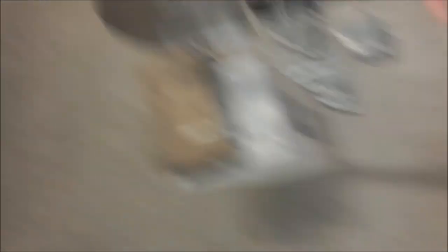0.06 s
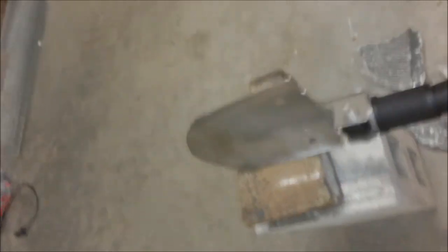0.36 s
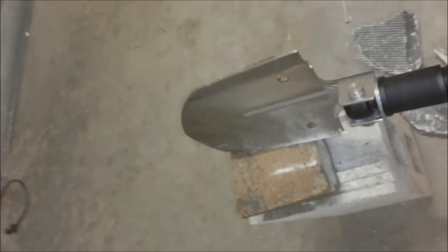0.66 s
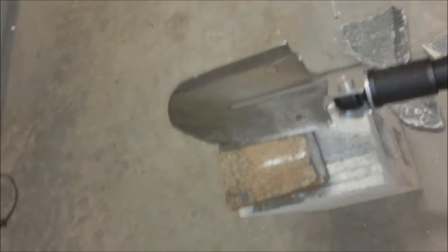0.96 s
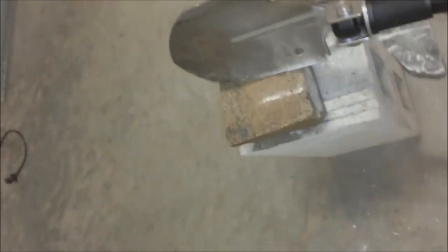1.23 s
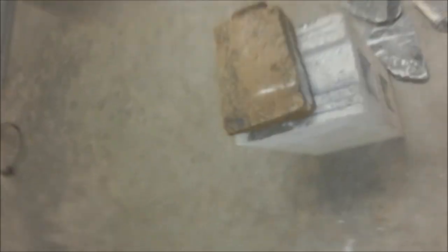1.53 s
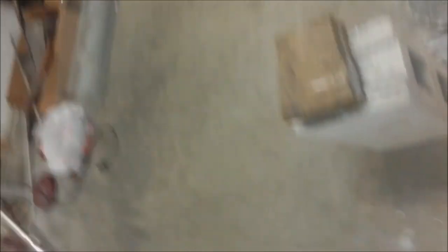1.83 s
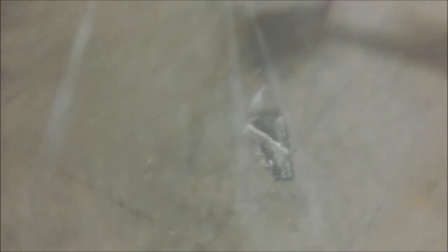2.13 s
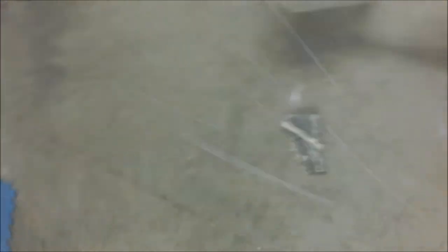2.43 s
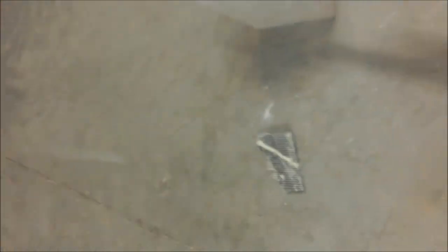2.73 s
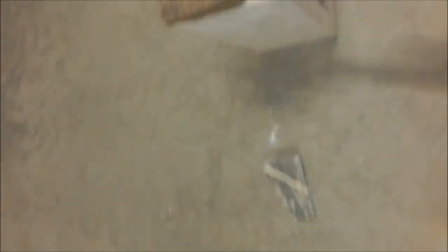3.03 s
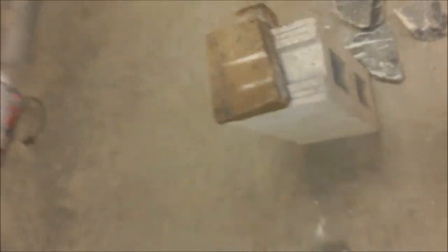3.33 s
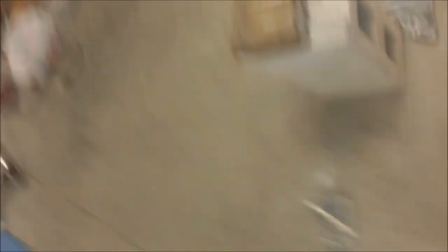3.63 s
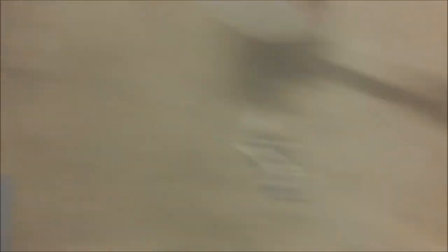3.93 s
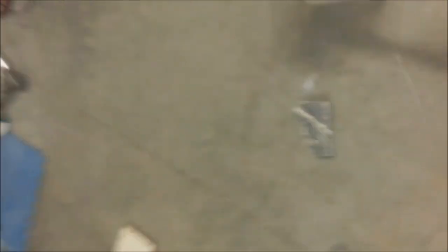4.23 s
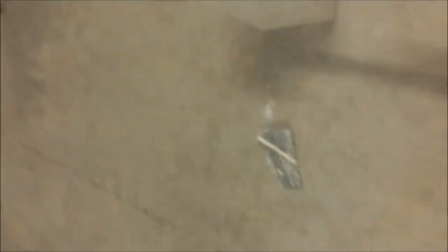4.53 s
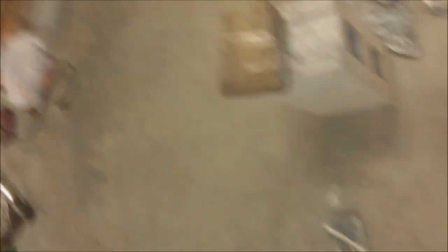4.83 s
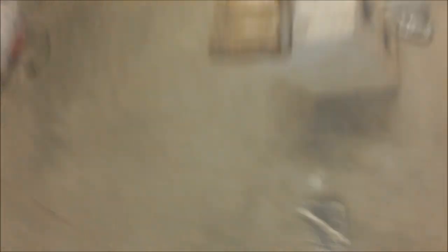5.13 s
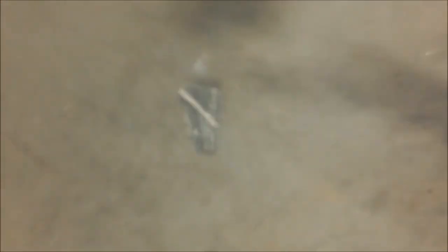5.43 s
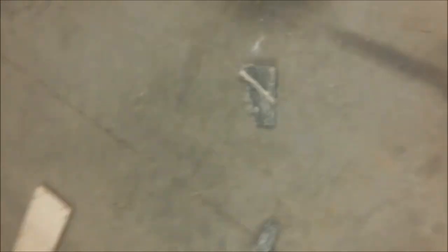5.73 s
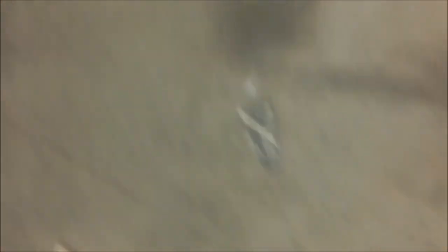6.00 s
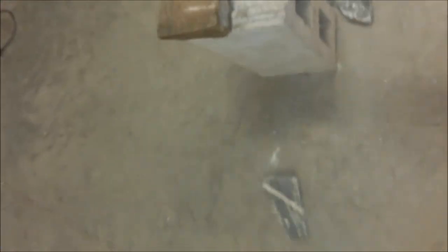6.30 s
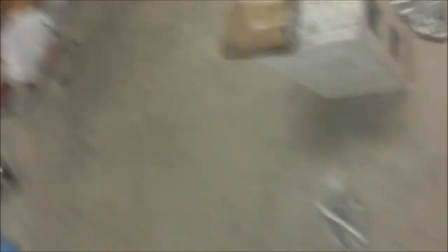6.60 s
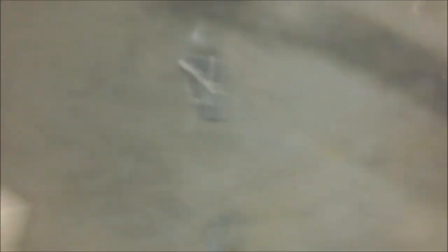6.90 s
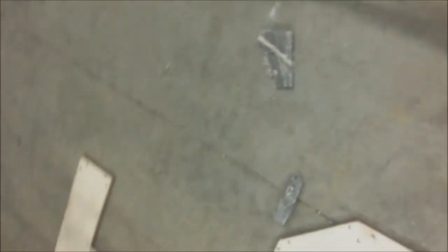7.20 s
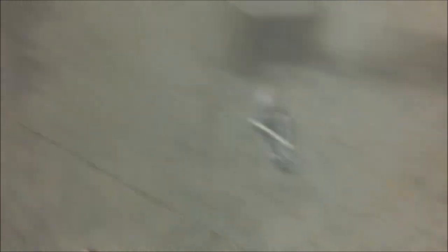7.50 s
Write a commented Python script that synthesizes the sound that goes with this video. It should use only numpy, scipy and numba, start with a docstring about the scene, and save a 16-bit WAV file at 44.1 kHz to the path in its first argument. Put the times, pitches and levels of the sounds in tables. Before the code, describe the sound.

A steel shovel chops a brick four times with crunching, ringing clangs in an echoing concrete garage.

```python
"""A bare concrete garage, a stereo microphone close to a brick. Over low room noise a steel shovel is set
on the brick and lifted. Four chops follow: sleeves rustle, the edge whistles faintly, brick crushes and
the blade rings on into the room, while the recorder's compressor and limiter hold each blow down.
The blade knocks lightly after the first two chops, something scuffs the floor before the third,
and grit ticks here and there to the end."""
import sys
import numpy as np
from scipy import signal
from scipy.fft import rfft, irfft, next_fast_len
from scipy.io import wavfile
from scipy.ndimage import uniform_filter1d
from numba import njit

SR = 44100
rng = np.random.default_rng(int(sys.argv[2]) if len(sys.argv) > 2 else 0)


def unload_audio(sound):
    """Save the sound as a 16-bit wav file, at the path given as the first command line argument."""
    columns = np.transpose(np.atleast_2d(sound))
    # keep every value between -1 and 1, then stretch to whole-number steps
    steps = np.round(np.clip(columns, -1, 1) * 32767)
    wavfile.write(sys.argv[1], SR, steps.astype(np.int16))


N = 337527
TIME = np.arange(N) / SR
TAIL = np.arange(int(1.6 * SR)) / SR  # seconds since the start of one event

# the four swings: landing_s, final_whistle_hz, whistle_db, wind_up_s, sleeves_db
SWINGS = [(2.222, 1157, -42.5, .6, -65), (3.951, 1544, -48, 0.46, -53.5), (5.472, 1445, -50, 0.538, -53),
          (6.932, 1448, -43, 0.32, -50.5)]


def undb(db):
    """Decibels to gain."""
    return 10 ** (np.asarray(db) / 20)


def unit(x):
    """Scale to rms 1."""
    return x / np.sqrt(np.mean(x ** 2))


def fade(t60):
    """A free decay that loses 60 dB in t60 seconds."""
    return np.exp(-np.log(1000) * TAIL / max(t60, 1e-3))


def colour(x, points):
    """Causal filter through (freq_hz, gain_db) points, built from the cepstrum of its log gain."""
    n = 2 * next_fast_len(x.shape[-1] // 2 + 1024)
    hz, db = np.transpose(points)
    log_hz = np.log(np.maximum(np.arange(n // 2 + 1) * SR / n, 1))
    cepstrum = irfft(np.log(undb(np.interp(log_hz, np.log(hz), db))))
    cepstrum[1:n // 2] *= 2
    cepstrum[n // 2 + 1:] = 0
    return irfft(rfft(x, n) * np.exp(rfft(cepstrum)))[..., :x.shape[-1]]


def walk(rate_hz, size=len(TAIL)):
    """A smooth random wander with a spread near 1."""
    step = max(int(SR / rate_hz), 2)
    knots = rng.standard_normal(size // step + 2)
    return uniform_filter1d(np.interp(np.arange(size) / step, np.arange(len(knots)), knots), step // 2)


def add(track, start_s, sound):
    """Mix a sound into the track at start_s."""
    start = int(start_s * SR)
    part = sound[..., :N - start]
    track[..., start:start + part.shape[-1]] += part


def stereo_noise(correlation, size=N):
    """Left and right noise that are partly alike."""
    mid, side = rng.standard_normal((2, size))
    spread = np.sqrt(1 - correlation) * side * np.array([[1], [-1]])
    return (np.sqrt(1 + correlation) * mid + spread) / np.sqrt(2)


def room_noise(level_db=-45, dip_db=-14.5, hold_s=1, recover_db_per_s=16, flutter_db=1):
    """A low, restless background that dips at each chop, stays down a while and creeps back."""
    # spectrum of the room noise: freq_hz, gain_db
    spectrum = [(15, -55), (25, -28), (86, -8.5), (125, 1.5), (150, -4.5), (475, -9.5), (1090, -14.5),
                (1210, -20.5), (1500, -18.5), (1960, -21), (3180, -25.5), (5880, -42), (6900, -69),
                (13800, -40), (15000, -33.5)]
    change_db = np.zeros(N)
    for landing_s, *_ in SWINGS:
        recovered_db = recover_db_per_s * np.maximum(TIME - landing_s - hold_s, 0)
        change_db = np.where(TIME > landing_s, np.minimum(dip_db + recovered_db, 0), change_db)
    noise = unit(colour(stereo_noise(correlation=0.73), spectrum))
    return noise * undb(level_db + change_db + flutter_db * walk(9, N))


def garage(x, build_s=0.015, early_db=3, early_s=0.013):
    """Floor and block reflect at once; the walls answer with a long tail that dulls as it fades."""
    # reverberation of the bare concrete: freq_hz, t60_s
    decays = [(50, 0.81), (130, 0.98), (300, 1), (700, 0.7), (1500, 0.91), (3000, 0.82), (6000, 0.59),
              (10000, 0.41), (15000, 0.19)]
    # likeness of diffuse sound at the microphone's two ports: freq_hz, correlation
    likeness = [(50, .2), (130, .75), (300, .65), (700, .25), (1500, 0), (3000, -.15), (15000, -.1)]
    log_hz = np.log(np.maximum(np.fft.rfftfreq(len(TAIL), 1 / SR), 1))
    centres = np.log([hz for hz, _ in decays])
    response = 0
    for this_band, (hz, t60) in zip(np.eye(len(decays)), decays):
        diffuse = stereo_noise(np.interp(hz, *np.transpose(likeness)), len(TAIL))
        band = np.sqrt(np.interp(log_hz, centres, this_band))
        response = response + irfft(rfft(diffuse) * band, len(TAIL)) * fade(t60)
    response *= 1 - np.exp(-TAIL / build_s) + undb(early_db) * np.exp(-TAIL / early_s)
    return signal.fftconvolve(x[None], unit(response) / np.sqrt(len(TAIL)), axes=1)[:, :N]


def nearby(x, count=14, decay_s=.014):
    """The straight path plus early reflections off floor, block and holder, different at each port."""
    response = np.zeros((2, SR // 40))
    response[:, 0] = 1
    for port in response:
        lags = rng.integers(8, len(port), count)
        port[lags] += .4 * rng.choice([-1, 1], count) * np.exp(-lags / (decay_s * SR))
    return signal.fftconvolve(x[None], response, axes=1)[:, :N]


def sleeves(grain_db=3, rise_s=0.14, settle_s=.08, idle_db=-65):
    """Cloth rubs in tiny slips through each wind-up, settles after the blow and stirs faintly between."""
    # spectrum of rubbing cloth: freq_hz, gain_db
    cloth = [(500, 1.5), (2000, -2), (4000, -4), (6800, -15.5), (8500, -11.5), (10000, 1), (12000, -12.5),
             (15000, -10.5)]
    folds_db = 1.5 * walk(25, N)
    slips = undb(grain_db * walk(620, N) + folds_db)
    motion = undb(idle_db)
    for landing_s, _, _, wind_up_s, db in SWINGS:
        rise = np.clip((TIME - landing_s + wind_up_s) / rise_s, 0, 1)
        settle = np.exp(-np.maximum(TIME - landing_s, 0) / settle_s)
        motion = motion + undb(db) * rise * settle
    return unit(colour(stereo_noise(correlation=0.1) * slips, cloth)) * motion


def grainy_burst(decay_s, grain_db=5):
    """A fading burst of tiny noise grains of uneven size, with the energy of 10 ms at rms 1."""
    sizes = undb(grain_db * walk(1500))
    burst = rng.standard_normal(len(TAIL)) * sizes * np.exp(-TAIL / decay_s)
    return burst * np.sqrt(SR / 100 / np.sum(burst ** 2))


def scuff(start_s=5.004, gain_db=-31, room_db=7):
    """A short dull scrape on the floor, reaching the microphone mostly through the room."""
    # spectrum of scraped concrete: freq_hz, gain_db
    spectrum = [(100, -20.5), (250, -7), (450, 5.5), (850, -3.5), (1350, 3), (2000, 3), (3600, -6),
                (5000, -26.5), (12000, -31)]
    direct = np.zeros(N)
    add(direct, start_s, undb(gain_db) * colour(grainy_burst(decay_s=.04), spectrum))
    return direct + undb(room_db) * garage(direct)


def grit_and_cloth(crumb_count=7, crumb_db=-54, spread_db=4, crumb_body_db=-15, crumb_s=.002, trim_db=-9.5):
    """Small bright clicks of grit, short brushes of cloth as a rustle starts, and faint random crumbs."""
    # clicks and brushes: start_s, relative_db, body_db (gain up to 4 kHz), decay_s
    ticks = [ (0.482, -49.5, -12, .002), (2.607, -43.5, -6, .002), (3.336, -30.5, 5, 0.0024),
             (3.356, -35, 4, 0.074), (3.562, -32.5, 6, 0.086), (4.513, -35.5, 1.5, 0.0017),
             (4.969, -40.5, -9, .002), (5.780, -31.5, -4, .002), (6.676, -37.5, 2.5, 0.0064),
             (6.830, -28, 4, 0.016), (7.475, -43.5, 19.5, 0.013)]
    # spectrum they all share: freq_hz, gain_db
    spectrum = [(150, -9), (600, -11), (2000, -0.5), (4500, -3.5), (6800, 0.5), (10000, 10), (12000, 1),
                (15000, -11.5)]
    crumbs = [(when * N / SR, crumb_db + spread_db * (2 * size - 1), crumb_body_db, crumb_s)
              for when, size in rng.random((crumb_count, 2))]
    out = np.zeros(N)
    for start_s, db, body_db, decay_s in list(ticks) + crumbs:
        tick = colour(grainy_burst(decay_s)[:SR // 2], [(4000, body_db), (8000, 0)])
        add(out, start_s, undb(db + trim_db) * tick)
    return colour(out, spectrum)


def swing_whistles(length_s=0.076, start_ratio=0.78):
    """Eddies shed by the blade's edge rise in pitch as it speeds up toward the brick."""
    out = np.zeros(N)
    progress = np.linspace(0, 1, int(length_s * SR))
    swell = np.sin(np.pi * progress ** 2)
    for landing_s, final_hz, db, *_ in SWINGS:
        eddies = 1 + .16 * walk(1500, len(progress))
        pitch_hz = final_hz * (start_ratio + (1 - start_ratio) * progress) * eddies
        add(out, landing_s - length_s, undb(db) * swell * np.sin(2 * np.pi * np.cumsum(pitch_hz) / SR))
    return out


def bending(hz, t60, pan_db, port_phase_rad, waver_db=3):
    """One bending mode of the blade, wavering in level and phase at each port; pan is left minus right."""
    ports = []
    for side in (.5, -.5):
        phase = 2 * np.pi * hz * TAIL + side * port_phase_rad + .4 * walk(16)
        ports.append(np.sin(phase) * undb(side * pan_db + waver_db * walk(13)))
    onset = 1 - np.exp(-TAIL / 0.002)
    return np.array(ports) * fade(t60) * onset


def beat(hz, lull_s, reflection_db=-6.5, bloom_db=3, bloom_s=0.073):
    """Gain of a mode as the moving blade beats against its reflection, which takes a moment to build."""
    reflection = undb(reflection_db) * np.exp(2j * np.pi * hz * (TAIL - lull_s))
    return np.abs(1 - reflection) * undb(-bloom_db * np.exp(-TAIL / bloom_s))


def upper_ring(t60_scale, spread_db=1.5, detune_spread=.001):
    """The blade's upper modes, in a slightly different mix each time the edge lands."""
    # upper modes of the steel: pitch_hz, relative_db, unscaled_t60_s
    modes = [ (1171.6, 0, 0.59), (1572, -5, 0.34), (2144, -2.5, 0.99), (2605, -7.5, 0.34),
             (2888, -10, 0.87), (2932, 4, 0.78), (3435, -4.5, .8), (3640, -8, 0.94), (3920, -9, 1.0),
             (4300, -7.5, .55), (4980, -2.5, .65), (6140, 1.5, 0.5), (7811, -11.5, .45), (8942, -4.5, .45),
             (10300, -3.5, .4), (10930, -2.5, .44), (11350, -5, .3)]
    chance = rng.standard_normal((len(modes), 2)) * (spread_db, detune_spread)
    return sum(undb(db + offset_db) * np.sin(2 * np.pi * hz * (1 + detune) * TAIL) * fade(t60 * t60_scale)
               for (hz, db, t60), (offset_db, detune) in zip(modes, chance))


def brick_crack(decay_s, hardness):
    """Steel crushes brick: fractures alone for the close sound, push and fractures for the room."""
    # spectrum of crushing brick: freq_hz, gain_db
    spectrum = [(30, -13), (70, 0), (115, 0), (160, 3.5), (250, 9), (480, 1.5), (680, -0.5), (1100, 3.5),
                (2300, -1), (3400, -0.5), (4800, -6.5), (6800, -7.5), (9000, 0), (10900, 1.5), (14500, -14)]
    push = np.sqrt(SR / 100) * (TAIL == 0)  # an impulse with the same energy as the fractures
    fractures = grainy_burst(decay_s)
    whole_blow = .8 * push + .6 * fractures
    return colour(colour(np.array([fractures, whole_blow]), spectrum), hardness)


def shovel(thump_hz=153, touch_s=0.074, crack_trim_db=-9.5, near_db=-2,
           crack_room_db=4, ring_room_db=5, ring_direct_db=-8):
    """Each contact cracks, rocks the brick and rings the blade; returns close sound and room feed."""
    # blade contacts, levels relative: start_s, crack_db, bass_db, edge_db, treble_db, crush_s, room_db,
    # thump_db, low_db, main_db, upper_db, t60_scale, extra_hz, extra_db, beat_hz, lull_s, free_s
    contacts = [ (0.535, -10.5, -3, -10.5, -2.5, 0.0041, -7.5, -23.5, -51, -57, -46, 0.95, 1210, -42.5, 3, 0.18, 1),
                (1.556, -22.5, -22, 1, 3, 0.0039, -3.5, -73, -55.5, -47.5, -48, 0.34, 2210, -49, 3.3, 0.18, 0.77),
                (2.226, 4.5, -1, -0.5, 0.5, 0.023, -0.5, -31.5, -18, -4.5, -23.5, 0.72, 2888, -21, 4.9, .29, 0.58),
                (2.738, -4.5, -4.5, -6, -13.5, .0035, -9.5, -50, -38, -29.5, -34.5, 0.47, 1595, -35.5, 3.4, 0.11, 0.57),
                (3.958, 5.5, -2.5, 2, -0.5, 0.01, .5, -21, -18.5, -16, -19.5, 0.57, 2636, -20.5, 2.7, 0.29, .48),
                (4.439, -4, -7.5, -4, -16, 0.0025, -10.5, -54, -55, -36.5, -37.5, 0.53, 2167, -40.5, 3.2, .25, .6),
                (5.478, 6, -2, -0.5, 1, .013, 1, -43, -10.5, -8, -20, 0.57, 2932, -19, 2.8, .07, 0.5),
                (6.943, 9.5, -5.5, 1.5, -2.5, 0.028, -1.5, -34, -14, -8.5, -20, 0.83, 3435, -28, 3.66, 0.089, .8)]
    near, to_room, tones = np.zeros(N), np.zeros(N), np.zeros((2, N))
    thump = np.sin(2 * np.pi * thump_hz * TAIL) * fade(t60=0.2)  # the brick rocks on its block
    for row in contacts:
        start_s, crack_db, bass_db, edge_db, treble_db, crush_s, room_db, thump_db = row[:8]
        low_db, main_db, upper_db, t60_scale, extra_hz, extra_db, beat_hz, lull_s, free_s = row[8:]
        hardness = [(250, bass_db), (900, 0), (2300, 0), (3800, edge_db), (9000, treble_db)]
        crack, boom = undb(crack_db + crack_trim_db) * brick_crack(crush_s, hardness)
        damping = np.exp(-np.maximum(TAIL - free_s, 0) / touch_s)  # a touch or the grip stills the ring
        ring = undb(upper_db) * colour(upper_ring(t60_scale), hardness) * damping
        add(near, start_s, crack + undb(ring_direct_db) * ring)
        main = bending(hz=1810, t60=1.53 * t60_scale, pan_db=-4.5, port_phase_rad=1.5, waver_db=2.6)
        main *= beat(beat_hz, lull_s)
        low = bending(hz=1075, t60=1.41 * t60_scale, pan_db=0, port_phase_rad=1.1)
        # an extra ringing mode whose pitch changes with where the edge lands
        extra = bending(extra_hz, t60=0.83, pan_db=-4, port_phase_rad=1.4)
        modes = undb(low_db) * low + undb(main_db) * main + undb(extra_db) * extra
        add(tones, start_s, undb(thump_db) * thump + damping * modes)
        # the walls return the blow and the loud start of the ring
        ring_start = ring * fade(t60=0.11)
        add(to_room, start_s, undb(crack_room_db + room_db) * boom + undb(ring_room_db) * ring_start)
    return undb(near_db) * nearby(near) + tones, to_room


def scene(ticks_room_db=1):
    """At the microphone: shovel, clicks and brushes, close and off the walls, over the quiet sounds."""
    # stereo balance of shovel, clicks and brushes: freq_hz, left_minus_right_db
    balance = [(100, -2), (600, 0.5), (1500, -3), (3000, -5), (6000, -1), (10000, 2.5)]
    near, to_room = shovel()
    ticks = grit_and_cloth()
    in_room = near + ticks + garage(to_room + undb(ticks_room_db) * ticks)
    sides = [colour(channel, [(hz, sign * db / 2) for hz, db in balance])
             for channel, sign in zip(in_room, (1, -1))]
    return np.array(sides) + swing_whistles() + scuff() + sleeves() + room_noise()


@njit
def follow(x, attack, release):
    """An envelope follower with separate rates for rising and falling."""
    out, level = np.empty(len(x)), 0.
    for i in range(len(x)):
        level += (x[i] - level) * (attack if x[i] > level else release)
        out[i] = level
    return out


def compress(x, threshold_db, attack_s, release_s, ratio):
    """Gain control that follows the louder channel and looks one millisecond ahead."""
    envelope = follow(np.abs(x).max(axis=0), 1 / (1 + attack_s * SR), 1 / (1 + release_s * SR))
    gain = np.minimum(undb(threshold_db) / (envelope + 1e-9), 1) ** (1 - 1 / ratio)
    return x * np.interp(TIME + .001, TIME, gain)


def record(dry, notch_hz=6600, notch_width_hz=78, top_hz=14600):
    """The microphone's port cancels a narrow band; the recorder compresses, limits and cuts the top."""
    notched = signal.lfilter(*signal.iirnotch(notch_hz, notch_hz / notch_width_hz, fs=SR), dry)
    compressed = compress(notched, threshold_db=-7.5, attack_s=0.0076, release_s=0.054, ratio=6.5)
    limited = compress(compressed, threshold_db=-2.5, attack_s=.0002, release_s=.006, ratio=20)
    lowpass = signal.ellip(8, .2, 70, top_hz, fs=SR, output="sos")
    return signal.sosfilt(lowpass, np.clip(limited, -1, 1))


dry = scene()
out = record(dry)
unload_audio(out)
```